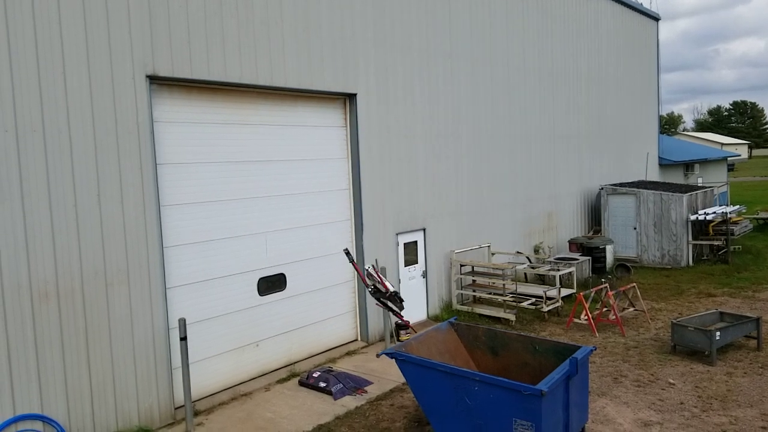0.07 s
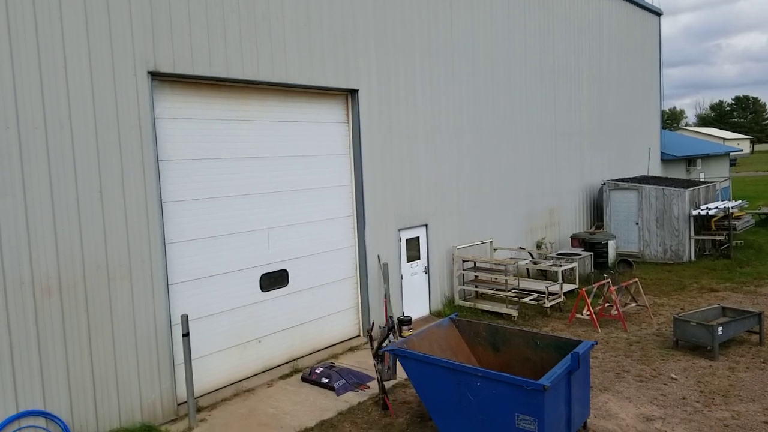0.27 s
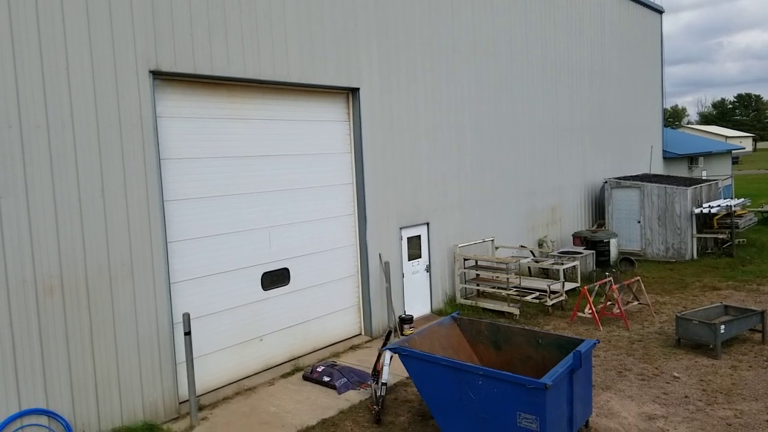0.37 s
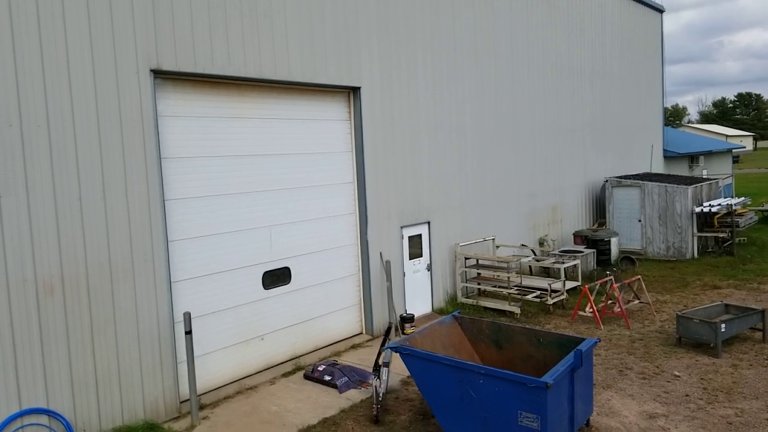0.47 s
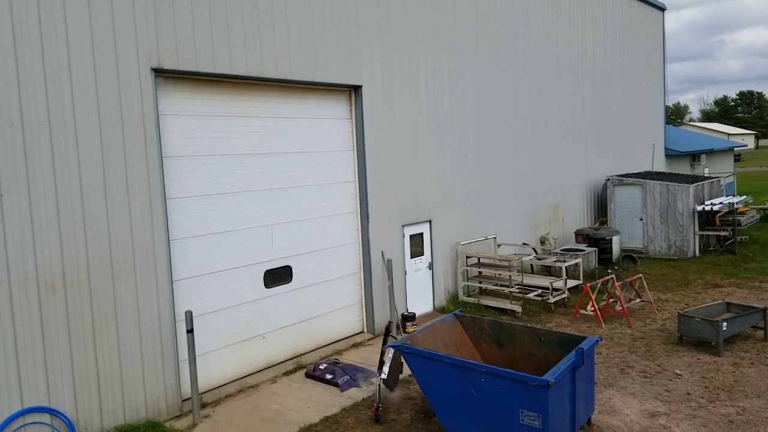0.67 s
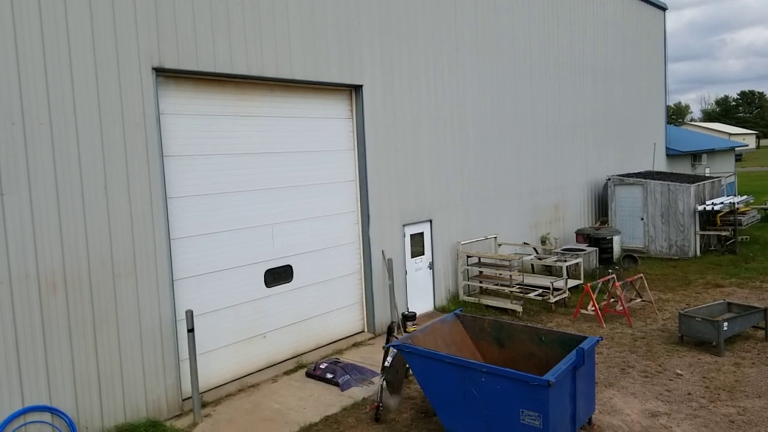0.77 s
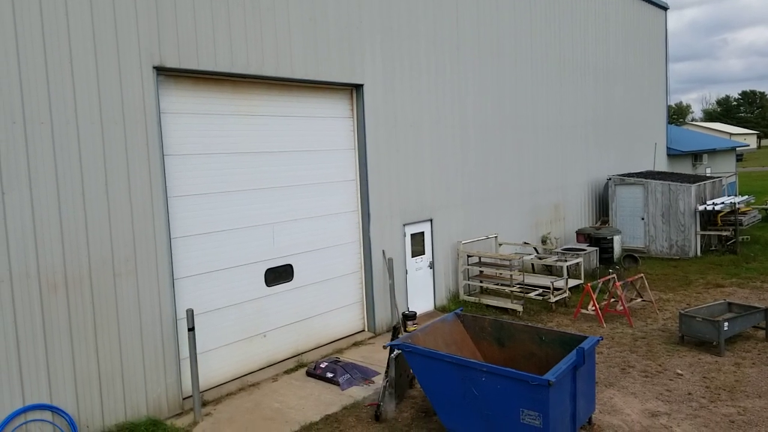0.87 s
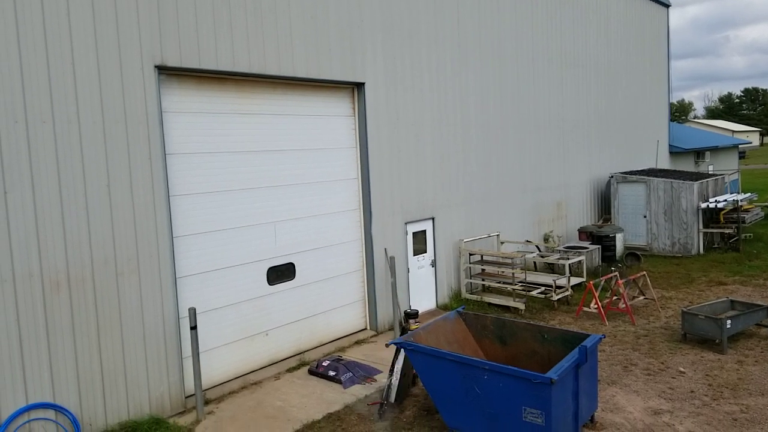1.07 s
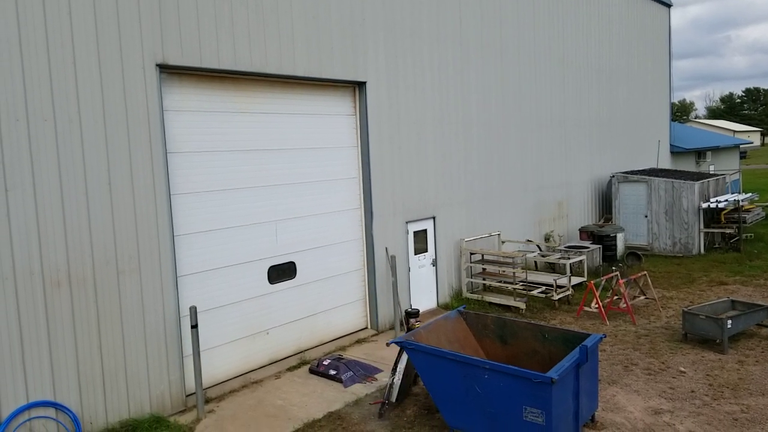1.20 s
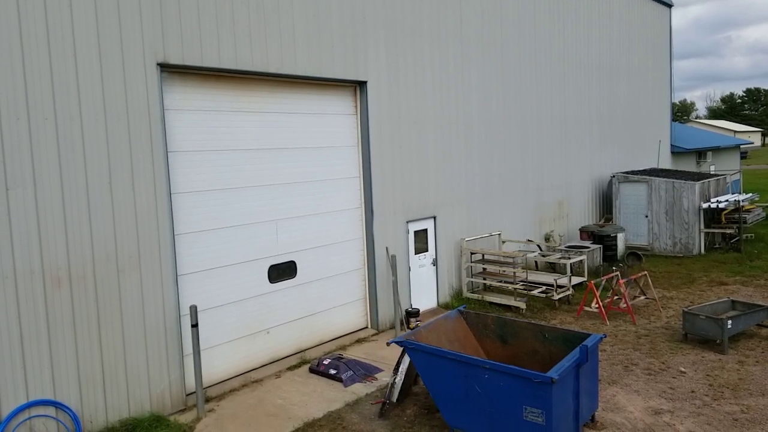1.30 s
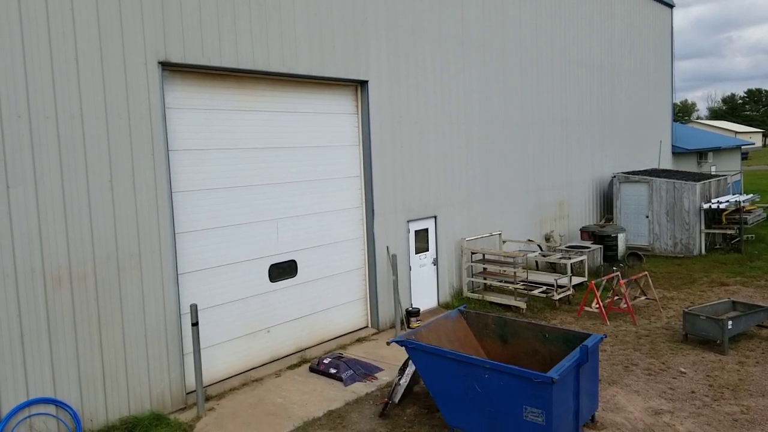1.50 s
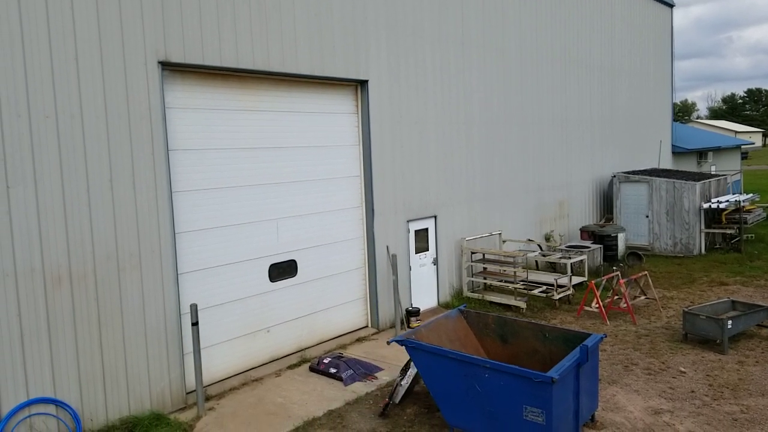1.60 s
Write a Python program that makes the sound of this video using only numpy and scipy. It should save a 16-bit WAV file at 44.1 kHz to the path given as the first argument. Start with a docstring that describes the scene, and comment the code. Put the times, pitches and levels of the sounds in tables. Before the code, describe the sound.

A heavy metal frame crashes onto a steel dumpster's rim and then the ground, with bright clanging and a hollow boom. It scrapes, rattles and knocks once more, echoing in an outdoor yard, with microphones facing the dumpster.

```python
"""A yard beside a metal shed, a stereo pair of microphones facing a steel dumpster.
A heavy metal frame lands on the rim and drops to the ground. Both crashes clang, spread into a
bright sizzle of chattering steel and set the dumpster's walls booming. The frame scrapes and
rattles as it settles, then knocks once more. The yard echoes. A machine hums steadily far off,
its level turned down from the first crash onward."""
import sys
import numpy as np
from scipy import signal
from scipy.fft import rfft, irfft, next_fast_len
from scipy.io import wavfile
from scipy.ndimage import uniform_filter1d

SR = 44100
rng = np.random.default_rng(int(sys.argv[2]) if len(sys.argv) > 2 else 0)


def dump(signal):
    """Clip the signal to [-1, 1] and save it as 16-bit WAV at the path in sys.argv[1]."""
    limited = np.clip(np.atleast_2d(signal).T, -1, 1)
    pcm = np.round(limited * 32767).astype(np.int16)
    wavfile.write(sys.argv[1], SR, pcm)


N = 72765
T = np.arange(N) / SR

# outdoor air at the microphones (frequency [Hz], relative level [dB])
AIR_SPECTRUM = [(20, -5), (60, 9.5), (130, -3), (210, -3.5), (300, -4.5), (560, -13.5), (850, -18),
                (1500, -13.5), (2500, -18.5), (3300, -30), (5000, -30.5), (7000, -39.5), (15000, -34.5)]
# steady distant hum, before it is turned down (frequency [Hz], level [dB])
HUM_TONES = [(206, -59), (624.5, -65), (1249, -71.5), (1583, -68.5), (1873, -82)]
# blows of the frame, levels relative (time [s], clang [dB], wall boom [dB], deep thud [dB])
FRAME_BLOWS = [(.238, -10, -15.5, -18), (.248, -11, -14.5, -9), (.261, -13, -19.5, -19.5),
               (.297, -14.5, -15.5, -24), (.324, -17.5, -17.5, -16), (.343, -38, -15.5, -10.5),
               (.372, -20, -18.5, -35), (.410, -21.5, -20, -29.5), (.458, -11.5, -20.5, -47),
               (.470, -15.5, -18, -36), (.500, -19.5, -34.5, -32), (.510, -15, -31.5, -30.5),
               (.605, -34, -32, -20.5), (.698, -44, -33.5, -27.5), (.820, -47, -35.5, -28.5),
               (.998, -46, -35.5, -47), (1.067, -54.5, -48.5, -34), (1.174, -45.5, -48.5, -41),
               (1.289, -59.5, -54, -42)]
# strongest modes of the frame (frequency [Hz], relative level [dB], t60 [s])
FRAME_TONES = [(990, 2, 0.33), (1190, -5.5, 0.8), (1410, -4, 0.37), (1456, -2, 0.33), (1626, -3, .35),
               (1819, -5, .4), (2320, -13, 0.12), (2490, -6, .45), (3078, -18, 0.36), (4530, -11, .3),
               (5109, -24.5, .25)]
# dense ringing of the frame (frequency [Hz], relative level [dB])
CLANG_SPECTRUM = [(30, -47.5), (200, -4.5), (450, -2.5), (620, -1.5), (800, -12), (1000, -2), (1550, 1.5),
                  (2000, -7), (2500, -1.5), (3200, -12), (4900, -11), (6500, -30), (12000, -28),
                  (16000, -30)]
# ringing time of free steel (frequency [Hz], t60 [s])
STEEL_DECAY = [(40, 0.85), (120, 1.8), (300, 1.41), (600, 0.51), (1200, 0.4), (2500, 0.48), (5000, 0.43),
               (9000, 0.35), (16000, 0.16)]
# higher modes of the dumpster's walls (frequency [Hz], relative level [dB], t60 [s])
WALL_TONES = [(112.6, -12, 2.7), (122.5, -6.5, 0.23), (160.4, -3.5, 1.8), (179.7, 1, 0.58),
              (214.3, -7.5, 1.5), (269, -3.5, 1.3), (291.3, -12, 2.5), (327.5, -5, 0.56), (368, -14, 0.39),
              (386.2, -3, 0.71), (413.8, -17.5, 1.2), (518, -17.5, 1.3), (534.5, -8.5, 1.1)]
# deep flexing modes of the dumpster (frequency [Hz], relative level [dB], t60 [s])
DEEP_TONES = [(40.7, -16, 0.56), (63.53, -1.5, 0.56), (69.7, -6.5, 1.6), (83.77, -8.5, .9)]
# dense ringing of the walls (frequency [Hz], relative level [dB])
BOOM_SPECTRUM = [(20, -38), (40, -10), (65, -13), (110, 1.5), (200, 1), (370, 0.5), (560, -7.5), (780, -19),
                 (2000, -62), (16000, -70)]
# chatter of loose steel after each crash (time [s], build-up [s], level [dB])
SIZZLE_SWELLS = [(.240, .060, -20), (.457, 0.044, -20.5)]
# colour of the chatter (frequency [Hz], relative level [dB])
SIZZLE_SPECTRUM = [(500, -26.5), (1500, -11.5), (3000, -2.5), (5000, 4), (6000, -6.5), (7000, -9.5),
                   (8600, -0.5), (10500, -4), (12300, 5.5), (14000, -5.5), (16000, -6.5)]
# echo of the yard (frequency [Hz], t60 [s])
YARD_DECAY = [(100, 1.6), (1500, 1.67), (4000, 1.105), (8000, 0.91), (16000, 0.39)]
# slides of the settling frame (time [s], length [s], level [dB])
SCRAPE_STROKES = [(0.776, 0.24, -58), (0.96, 0.064, -41), (1.032, 0.048, -45), (1.08, 0.071, -45),
                  (1.158, 0.027, -42)]
# colour of the scraping (frequency [Hz], relative level [dB])
SCRAPE_SPECTRUM = [(200, 6), (500, 1.5), (750, -2), (1300, 8), (2500, 3.5), (3300, -4), (5000, -2.5),
                   (6500, -27), (9500, -19.5), (12300, -8.5), (16000, -41)]
# colour of the last knock (frequency [Hz], relative level [dB])
KNOCK_SPECTRUM = [(40, -22.5), (110, -15.5), (200, 6), (450, 3.5), (750, -9.5), (1400, -4), (2700, -12.5),
                  (3600, -20), (5000, -17), (7000, -34), (12000, -34.5), (16000, -35)]
# likeness of noise at the two microphones (frequency [Hz], correlation [0-1])
MIC_LIKENESS = [(50, .995), (300, .985), (700, .72), (1400, .48), (2800, 0), (16000, 0)]
# lean towards the left microphone (frequency [Hz], left minus right [dB])
MIC_BALANCE = [(50, .3), (700, .3), (1400, 1.8), (2800, 2.3), (6000, 1.8), (14000, 3.2)]


def amp(db):
    """Decibels to gain."""
    return 10 ** (np.asarray(db) / 20)


def read(points, hz):
    """A table's value on a log-frequency axis."""
    f, value = np.transpose(points)
    return np.interp(np.log(hz + 1), np.log(f + 1), value)


def add(mix, s, sound):
    """Mixes a sound in at time s."""
    part = mix[..., round(s * SR):]
    part += sound[..., :part.shape[-1]]


def excite(x, response):
    """Passes a sound through a stereo response scaled to unit energy."""
    response = response / np.sqrt(np.sum(response ** 2) / 2)
    return signal.fftconvolve(np.atleast_2d(x), response, axes=1)[:, :N]


def noise(spectrum):
    """Stereo noise of unit level: alike in the bass, wide in the treble."""
    size = next_fast_len(N)
    hz = np.fft.rfftfreq(size, 1 / SR)
    left, other = rfft(rng.standard_normal((2, size)))
    likeness = np.clip(read(MIC_LIKENESS, hz), -1, 1)
    right = likeness * left + np.sqrt(1 - likeness ** 2) * other
    gain = amp(read(spectrum, hz))
    return irfft(np.array([left, right]) * gain / np.sqrt(np.mean(gain ** 2)), size)[:, :N]


def ring(spectrum, t60s=STEEL_DECAY, t60_scale=1):
    """Countless close modes, each band dying at its own speed; random clusters stand out above 900 Hz."""
    hz, t, bands = signal.stft(noise(spectrum), SR, nperseg=512)
    ripple = uniform_filter1d(rng.standard_normal(len(hz)), size=3) * np.sqrt(3)
    cluster_db = 3.6 * (np.clip(ripple, -1.5, 1.5) - .3) * (hz > 900)
    decay_db = -60 * t / (t60_scale * read(t60s, hz)[:, None])
    return signal.istft(bands * amp(cluster_db[:, None] + decay_db), SR, nperseg=512)[1][:, :N]


def struck(modes):
    """Decaying tones that start from rest."""
    return sum(amp(db - 60 * T / t60) * np.sin(2 * np.pi * hz * T) for hz, db, t60 in modes)


def contacts(per_s):
    """Random tiny impacts of uneven strength, at unit power."""
    return rng.standard_normal(N) * (rng.random(N) < per_s / SR) * np.sqrt(SR / per_s)


def crack(rise_s=0.00053, fall_s=0.024):
    """Envelope of a hard hit: a sharp peak that falls back to half."""
    return (1 - np.exp(-T / rise_s)) * (1 + np.exp(-T / fall_s)) / 2


def air():
    """A faint rumble of outdoor air around the microphones."""
    return amp(-54) * noise(AIR_SPECTRUM)


def machine(duck_at_s=.3, duck_db_per_s=18):
    """A steady distant hum, its level turned down from the first crash onward."""
    hum = sum(amp(db) * np.sqrt(2) * np.sin(2 * np.pi * (hz * T + rng.random())) for hz, db in HUM_TONES)
    return hum * amp(-duck_db_per_s * np.maximum(T - duck_at_s, 0))


def frame_clang():
    """Each blow rings the frame's strong modes over a new mix of the countless weak ones."""
    out = np.zeros((2, N))
    tones = amp(-14) * struck(FRAME_TONES)
    for s, clang_db, _, _ in FRAME_BLOWS:
        add(out, s, amp(clang_db) * crack() * (ring(CLANG_SPECTRUM) + tones))
    return out


def dumpster_boom(rise_s=0.0017, duck_at_s=0.466, duck_length_s=0.038, duck_db=-7):
    """The blows push the big steel walls, which boom in long low modes."""
    early, late = np.zeros((2, N)), np.zeros((2, N))
    rise = 1 - np.exp(-T / rise_s)
    walls = amp(-1.5) * struck(WALL_TONES)
    deep = amp(-2) * struck(DEEP_TONES)
    for s, _, boom_db, thud_db in FRAME_BLOWS:
        dense = amp(-2.5) * ring(BOOM_SPECTRUM)
        boom = amp(boom_db) * (dense + walls) / 2 + amp(thud_db) * deep
        add(early if s < duck_at_s + duck_length_s else late, s, rise * boom)
    # the earlier boom drops quickly in level at the second crash
    duck = amp(duck_db * np.clip((T - duck_at_s) / duck_length_s, 0, 1))
    return early * duck + late


def sizzle(fall_s=0.042):
    """Shaken steel chatters against steel: the treble swells after each crash and dies."""
    out = np.zeros((2, N))
    for s, build_s, db in SIZZLE_SWELLS:
        swell = np.interp(T, [0, build_s], [0.69, 1])
        fall = np.exp(-np.maximum(T - build_s, 0) / fall_s)
        chatter = swell * fall * contacts(per_s=5800)
        add(out, s, amp(db) * excite(chatter, ring(SIZZLE_SPECTRUM, t60_scale=0.68)))
    return out


def yard_echo(direct, delay_s=.02, level_db=-20.5):
    """Echoes from the shed and the yard reach the microphones after the direct sound."""
    flat_spectrum = [(20, 0), (16000, 0.0035)]
    tail = np.zeros((2, N))
    add(tail, delay_s, ring(flat_spectrum, YARD_DECAY))
    return amp(level_db) * excite(direct, tail)


def scrapes():
    """The frame slips down the dumpster's side in bursts of small catches, damped by the contact."""
    force = np.zeros(N)
    for s, length_s, db in SCRAPE_STROKES:
        arch = abs(np.sin(np.pi * np.minimum(T / length_s, 1)))
        add(force, s, amp(db) * np.sqrt(arch))
    return excite(force * contacts(per_s=590), ring(SCRAPE_SPECTRUM, t60_scale=0.37))


def last_knock(at_s=1.637):
    """The frame knocks once more, lightly, and the steel gives a dull ring."""
    out = np.zeros((2, N))
    add(out, at_s, amp(-32.5) * crack() * ring(KNOCK_SPECTRUM))
    return out


def scene():
    """At the microphones: the crashes and their echo a little to the left, over air and distant hum."""
    steel = frame_clang() + last_knock() + sizzle() + scrapes()
    boom = dumpster_boom()
    add(steel[0], 0, boom[0])
    add(steel[1], 0.00015, boom[1])  # the boom reaches the right microphone later
    spectrum = rfft(steel + yard_echo(steel), 2 * N)
    balance_db = read(MIC_BALANCE, np.fft.rfftfreq(2 * N, 1 / SR))
    lean = amp(np.outer([1, -1], balance_db) / 2)
    return irfft(spectrum * lean)[:, :N] + machine() + air()


def record(dry):
    """Behind the microphones: low cut, soft overload of the loudest peaks, band limit."""
    low_cut_hz, headroom, top_hz = 44, 1.33, 15650
    low_cut = signal.butter(3, low_cut_hz, "high", fs=SR, output="sos")
    rounded = headroom * np.tanh(signal.sosfilt(low_cut, dry) / headroom)
    low_pass = signal.firwin(511, top_hz, window=("kaiser", 9), fs=SR)
    return signal.oaconvolve(rounded, low_pass[None], "same", axes=1)


dry = scene()
out = record(dry)
dump(out)
```